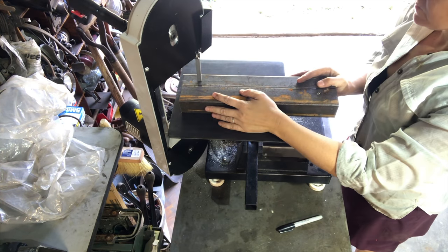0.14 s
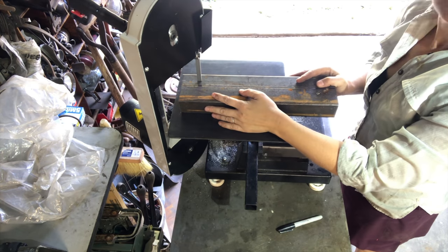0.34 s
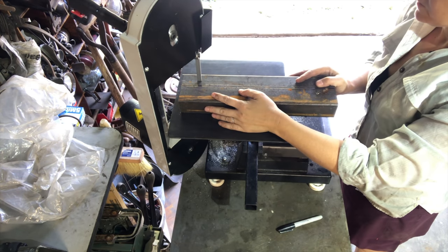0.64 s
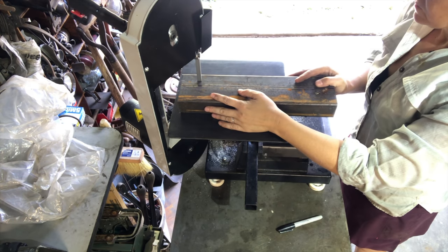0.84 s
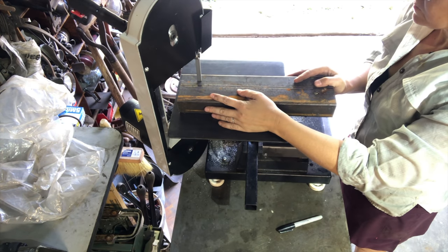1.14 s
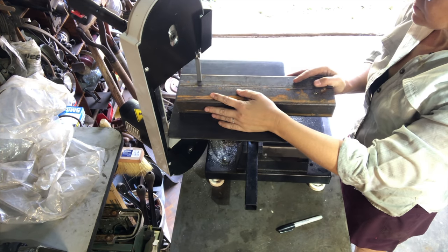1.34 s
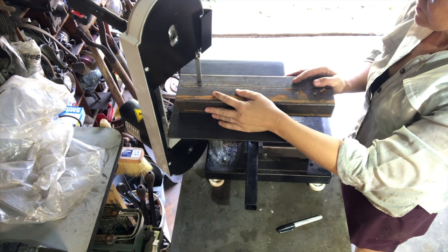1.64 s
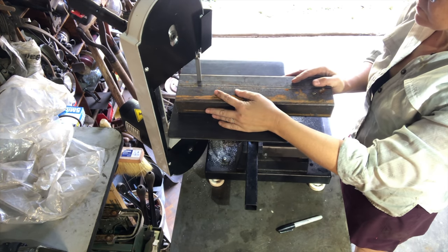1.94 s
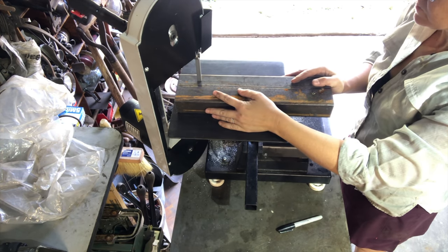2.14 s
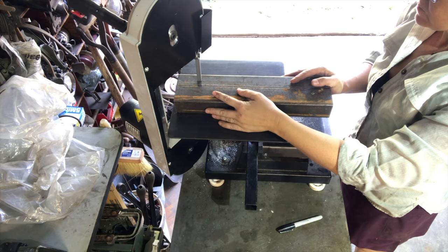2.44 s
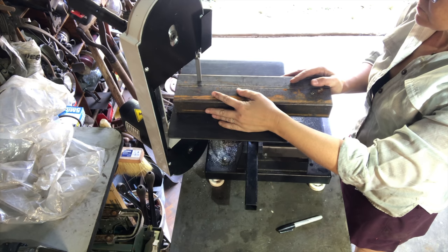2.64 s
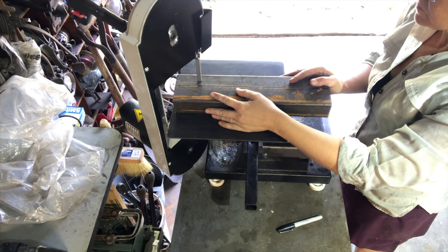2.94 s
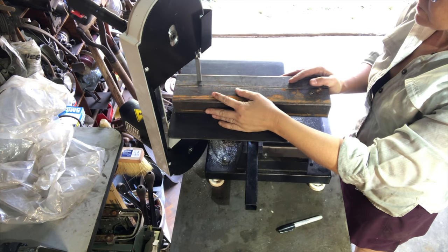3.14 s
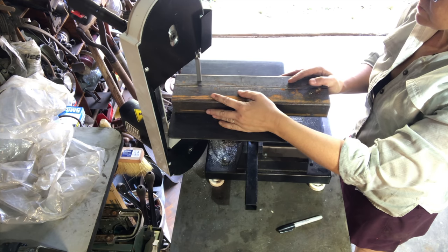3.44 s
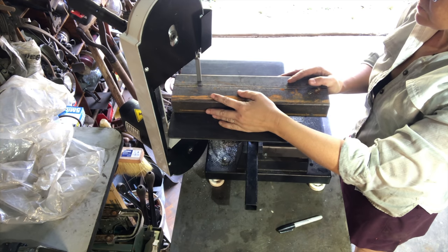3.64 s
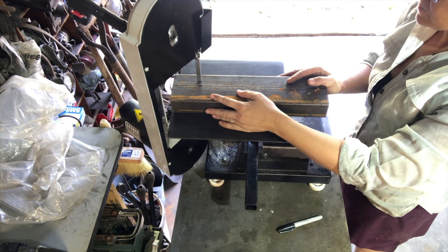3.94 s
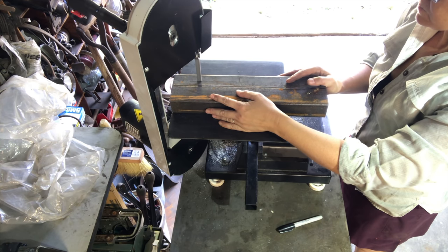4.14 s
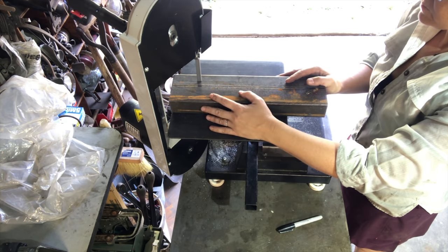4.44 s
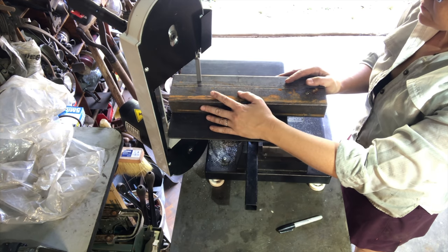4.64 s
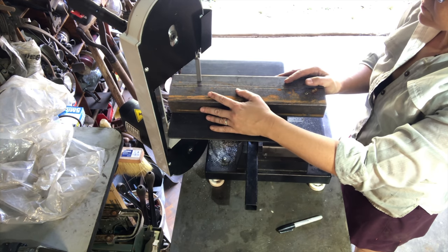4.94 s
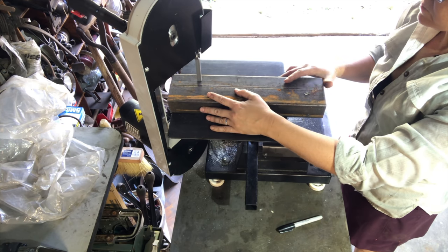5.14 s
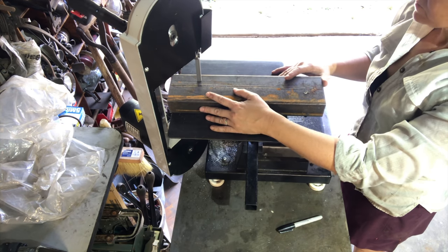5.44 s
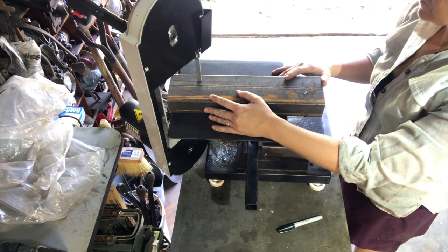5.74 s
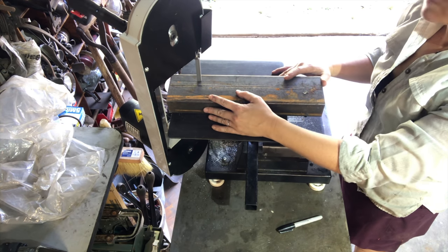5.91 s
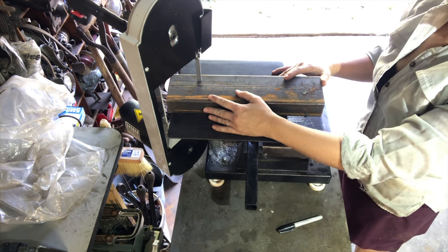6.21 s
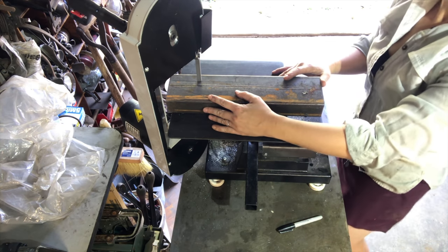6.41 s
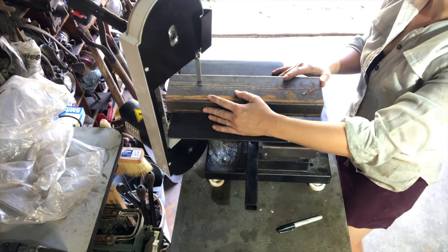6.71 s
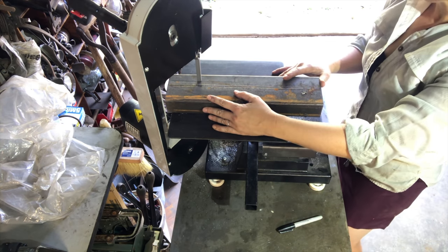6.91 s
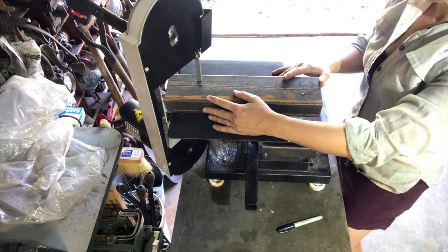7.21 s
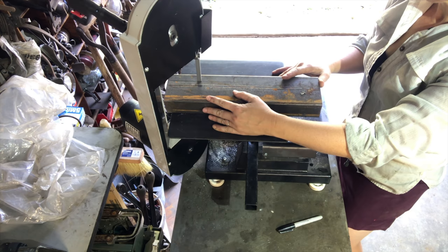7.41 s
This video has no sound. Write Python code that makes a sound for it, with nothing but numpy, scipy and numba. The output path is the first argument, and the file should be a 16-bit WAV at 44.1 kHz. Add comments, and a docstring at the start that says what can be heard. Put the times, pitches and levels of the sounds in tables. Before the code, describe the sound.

A bandsaw cuts a steel tube up close, its motor whining steadily under a pulsing metallic rasp, with high squeals near the end.

```python
"""In a workshop, close by, an upright portable bandsaw cuts a square steel tube fed by hand.
Motor and gears whine at multiples of the shaft speed, and the stand drones. The teeth excite blade and
tube in a rasp that changes colour twice; its pattern repeats with each lap of the blade, whose weld
catches once a lap. The cut wall rings ever lower as the slit grows, swelling whenever it passes a
multiple of the shaft speed, and friction in the deepening slit makes the blade squeal."""
import sys
import numpy as np
from scipy import signal
from scipy.fft import rfft, irfft
from scipy.io import wavfile
from scipy.ndimage import uniform_filter1d
from numba import njit

SR = 44100
rng = np.random.default_rng(int(sys.argv[2]) if len(sys.argv) > 2 else 0)


def wav_out(sig):
    """Save sig, one row per channel (or a flat mono array), as 16-bit PCM at SR to the path in sys.argv[1]."""
    wavfile.write(sys.argv[1], SR, np.round(np.clip(np.atleast_2d(sig).T, -1, 1) * 32767).astype(np.int16))


N = 333837
TIME = np.arange(N) / SR
FREQ = np.fft.rfftfreq(N, 1 / SR)

# shaft speed under load, before the spin-up lag is subtracted: (time [s], speed [Hz])
SHAFT_SPEED = [(.7, 228), (1.1, 225.9), (1.35, 225.6), (2.1, 227.5), (2.45, 226.9), (4.2, 227.1),
               (4.45, 228.1), (5.13, 227.6), (5.27, 229.4), (5.6, 229.5), (6.05, 228.4), (6.6, 230.1),
               (7, 228.7), (7.57, 227.7)]
# three stages of the cut, the early one taking the rest: (time [s], middle share [1], late share [1])
STAGE_SHARES = [(2.62, 0, 0), (2.68, 1, 0), (4.69, 1, 0), (4.73, .25, .4), (5.17, .2, .55), (5.28, 0, .9),
                (6, 0, 1)]
# patches of proud teeth: (position after the weld [laps], extra bite [dB])
PROUD_TEETH = [(0, 8), (.145, 4), (.26, 2.5), (.355, 6), (.465, 5), (.58, 6), (0.702, 8), (.85, 5.5)]
# motor harmonics: (shaft multiple before rounding [1], early level [dB], middle [dB], late [dB])
MOTOR_HARMONICS = [(7.04, -40, -41, -43), (8, -52.5, -74, -56), (9, -41, -45, -42.5), (10, -41.5, -50, -42),
                   (11, -43.5, -48.5, -51), (12, -52.5, -60, -55), (16, -48.5, -50.5, -46),
                   (18, -45, -53, -63), (19, -47.5, -42.5, -42.5), (21, -36.5, -52, -55),
                   (22, -35, -74, -39), (23, -39.5, -36, -51), (24, -36.5, -43.5, -49.5),
                   (26, -46.5, -52, -58), (27, -61, -52, -68), (30, -74, -55.5, -67), (32, -68, -64, -78),
                   (36, -56, -56, -74), (43, -47, -47, -68), (55, -70, -40, -77)]
# tone of the meshing gears: (time [s], level [dB])
GEAR_LEVEL = [(0, -45.5), (.6, -38.5), (2.5, -40.5), (5, -40), (6, -36), (7.57, -36.5)]
# the blade singing on one shaft harmonic: (time [s], level [dB])
BLADE_SONG = [(0, -52), (.2, -46), (.6, -55), (2.6, -54), (4.2, -47), (4.65, -37), (4.75, -50), (6.2, -46),
              (6.75, -39), (7.05, -34.5), (7.57, -33)]
# modes of the stand: (frequency [Hz], width [Hz], gain [dB])
STAND_MODES = [(245.5, 18.5, -3), (298, 28, -3.5), (407.7, 7.7, 1.5), (524, 13, -2), (740, 20, -21)]
# feed of the tube: (time [s], rasp gain [dB], further gain of the chips' sizzle [dB])
FEED_GAIN = [(0, -26, -9), (.9, -25, -7), (2.4, -26, -9.5), (2.8, -25, -8), (4.65, -25.5, -7.5),
             (4.78, -31.5, -5.5), (5.45, -30.5, -5), (5.8, -28, -4), (6.1, -28.5, -2.5), (7.57, -30, -2)]
# the hand eases off or shoves: (time [s], half length [s], change [dB])
HAND_NUDGES = [(.41, 0.011, -3.5), (2.53, .03, -2), (5.236, 0.021, -6.5), (5.272, 0.019, 4),
               (5.402, 0.015, -4), (5.495, 0.017, 1)]
# modes of blade and tube in each stage: (frequency [Hz], width [Hz], gain [dB])
MODES_EARLY = [(2250, 35, -11), (3660, 40, -14), (4020, 69, -7), (4450, 95, -12), (4990, 69, -3),
               (5170, 64, 0), (6500, 250, -24), (8080, 234, -18), (9900, 354, -22), (12920, 142, -22),
               (14160, 250, -24)]
MODES_MIDDLE = [(1631, 29, -5.5), (2280, 13.6, -7.5), (3420, 51, -14.5), (3970, 69, -8), (4540, 174, -13.5),
                (5126, 166, -5.5), (7980, 36, -24), (9460, 1140, -22), (11360, 240, -15.5),
                (12400, 190, -17), (12700, 78, -24)]
MODES_LATE = [(1646, 68, -2), (2292, 43, 0.5), (3506, 104, -5.5), (3914, 280, -6), (4576, 160, -5),
              (5300, 203, -6), (6960, 54, -8.5), (8056, 205, -2), (9350, 740, -7), (10540, 155, 0),
              (11620, 150, -10.5)]
# broad scraping spectrum in each stage: (frequency [Hz], gain [dB])
SCRAPE_EARLY = [(40, -50), (110, -59.5), (240, -35.5), (1000, -34), (1350, -21.5), (1800, -13),
                (2400, -15.5), (2850, -23.5), (3300, -16.5), (5400, -16.5), (6200, -20.5), (11000, -24),
                (14500, -20.5), (15800, -33)]
SCRAPE_MIDDLE = [(40, -66), (110, -60), (240, -38), (1000, -32.5), (1350, -26), (1800, -25.5), (2400, -24),
                 (2850, -29), (3300, -20.5), (5400, -27.5), (6200, -32.5), (11000, -24), (14500, -23),
                 (15800, -30)]
SCRAPE_LATE = [(40, -65), (110, -53), (240, -27), (1000, -26), (1350, -14.5), (1800, -8), (2400, -7.5),
               (2850, -16), (3300, -7), (5400, -17.5), (6200, -15.5), (11000, -18.5), (14500, -18),
               (15800, -22)]
# drive of the teeth on the cut wall: (time [s], level before the swell [dB])
WALL_DRIVE = [(0, -51), (.6, -37), (1.25, -37), (1.6, -38.5), (2.2, -33.5), (2.7, -42), (3, -38),
              (3.8, -37.5), (4.3, -33), (4.9, -26.5), (5.35, -37.5), (6.1, -38.5), (7.1, -32.5),
              (7.57, -44)]
# faint upper mode at the slit: (time [s], frequency [Hz], level [dB])
WALL_UPPER_MODE = [(0, 8200, -54), (.8, 7660, -42), (1.7, 7380, -48), (2.6, 7320, -46), (3.5, 6900, -51),
                   (4.6, 6900, -76), (7.57, 6670, -48)]
# squeaks as the teeth first catch: (time [s], half length [s], frequency [Hz], peak level [dB])
SQUEAKS = [(.145, .04, 5050, -27), (.181, .016, 2208, -28), (.181, .018, 4416, -27)]
# how hard the weld catches: (time [s], strength [dB])
WELD_STRENGTH = [(.18, -18), (.38, -25), (.9, -33), (1.35, -18.5), (2.5, -17), (4.2, -16.5), (4.6, -25),
                 (5.1, -18.5), (5.6, -28.5), (6.5, -20), (7.1, -28)]
# two high blade modes: (time [s], lower mode [Hz], its level [dB], upper mode [Hz], its level [dB])
SQUEAL_MODES = [(0, 7960, -65, 10700, -75), (3.6, 8460, -64, 10500, -59), (4.9, 8240, -38, 10570, -49),
                (5.7, 8300, -51, 10370, -49), (6.3, 8500, -51.5, 10800, -52), (6.65, 8160, -56, 10610, -36),
                (7.1, 8030, -35.5, 10600, -36), (7.57, 7960, -32, 10700, -48)]


def undb(db):
    """Amplitude ratio of a level in decibels."""
    return 10 ** (np.asarray(db) / 20)


def curves(table):
    """Linear interpolation of each column in time."""
    times, *columns = np.transpose(table)
    return [np.interp(TIME, times, column) for column in columns]


def unit(x):
    """Normalisation to rms 1."""
    return x / np.sqrt(np.mean(x ** 2))


def steady(x, span_s):
    """Normalisation to a running rms of 1."""
    return x / np.sqrt(np.abs(uniform_filter1d(x ** 2, int(span_s * SR) + 1)) + 1e-14)


def bump(x, half_width):
    """Gaussian pulse of height 1 at x = 0."""
    return np.exp(-(x / half_width) ** 2)


def wander(rate_hz):
    """Smooth random modulation of rms 1."""
    knots = rng.standard_normal(4096)
    path = np.interp(TIME * rate_hz, np.arange(len(knots)), knots)
    return unit(uniform_filter1d(path, int(SR / rate_hz / 2) + 1))


def resonances(modes):
    """Superposition of steep resonance peaks, as a power response."""
    return sum(undb(db) ** 2 / (1 + (np.sqrt(2) - 1) * (2 * (FREQ - hz) / width) ** 2) ** 2
               for hz, width, db in modes)


def broadband(points):
    """Power response interpolated over logarithmic frequency."""
    hz, db = np.transpose(points)
    return undb(np.interp(np.log(FREQ + 1), np.log(hz), db)) ** 2


def colour(x, power, size=8192):
    """Minimum-phase filtering: by causality, resonances ring after each blow."""
    log_gain = np.interp(np.fft.rfftfreq(size, 1 / SR), FREQ, np.log(power + 1e-14) / 2)
    cepstrum = irfft(log_gain)[:size // 2]
    response = irfft(np.exp(rfft(np.r_[cepstrum[0], 2 * cepstrum[1:]], size)))
    return signal.fftconvolve(x, response)[:N]


def band(x, kind, edge_hz):
    """Steep filtering with a maximally flat passband."""
    return signal.sosfilt(signal.butter(6, edge_hz, kind, fs=SR, output="sos"), x)


@njit
def resonator(x, hz, width_hz):
    """Damped resonance with a moving centre, as a state-variable band-pass."""
    out, band_state, low_state = np.empty(len(x)), 0., 0.
    for i in range(len(x)):
        tuning, damping = np.tan(np.pi * hz[i] / SR), width_hz / hz[i]
        velocity = (band_state + tuning * (x[i] - low_state)) / (1 + tuning * (tuning + damping))
        band_state = 2 * velocity - band_state
        low_state += 2 * tuning * velocity
        out[i] = damping * velocity
    return out


def shaft_speed(lag_hz=15.5, spin_up_s=.25):
    """Exponential approach to a running speed [Hz] that sags and recovers with the load."""
    return curves(SHAFT_SPEED)[0] - lag_hz * np.exp(-TIME / spin_up_s)


def bite(laps, plain_db=-1.5, flutter_db=1.56):
    """Periodic modulation [dB]: each lap the proud teeth dig in and those behind the weld skip."""
    def patch(position, half_length):
        return bump((laps - position + .5) % 1 - .5, half_length)
    proud_db = sum(db * patch(position, .055) for position, db in PROUD_TEETH)
    skip_db = -3 * patch(.1, .025)
    return plain_db + proud_db + skip_db + flutter_db * wander(200)


def partial(turns, order, shake=.013, flicker=.9):
    """Phase modulation: gear play shakes a shaft multiple, the higher the more; its level flickers."""
    phase = 2 * np.pi * (order * turns + rng.random()) + shake * order * wander(70)
    flicker_db = flicker * np.sqrt(order / 10) * (wander(14) + wander(90))
    return np.sqrt(2) * np.sin(phase) * undb(flicker_db)


def whine(turns, laps, shares, mesh_ratio=6.033, song_order=20, first_blade_order=21):
    """Periodic forcing: the shaft drives motor harmonics, a gear-mesh tone and the blade's song."""
    spin_up_db = -.5 * np.clip(1 - TIME / .77, 0, 1)  # per order, so high harmonics fade in most
    sputter_db = -2 + .58 * bite(laps)
    motor = 0
    for multiple, *stage_db in MOTOR_HARMONICS:
        order = round(multiple)
        db = np.array(stage_db) @ shares + order * spin_up_db
        if order >= first_blade_order:  # these sound through the blade and follow its bite
            db += sputter_db
        motor += partial(turns, order) * undb(db)
    gears = partial(turns, mesh_ratio, flicker=0) * undb(curves(GEAR_LEVEL)[0])
    song = partial(turns, song_order, shake=.0078, flicker=.7) * undb(curves(BLADE_SONG)[0])
    return motor + gears + song


def stand_drone(drone_db=-65, hum_hz=123.8, hum_db=-85.5):
    """Random excitation: the saw shakes the stand's low modes, while the motor frame hums."""
    drone = unit(colour(rng.standard_normal(N), resonances(STAND_MODES)))
    hum = np.sqrt(2) * np.sin(2 * np.pi * hum_hz * TIME)
    return drone * undb(drone_db) + hum * undb(hum_db)


def tooth_force(turns, grain_db=2.5, pulse_depth=.16):
    """Broadband excitation by dense tiny fractures, pulsing slightly with the shaft."""
    grains = np.repeat(rng.standard_normal(N // 16 + 1), 16)[:N]
    pulsing = 1 + pulse_depth * np.cos(2 * np.pi * turns)
    return unit(rng.standard_normal(N) * undb(grain_db * grains) * pulsing)


def hand_pressure():
    """Amplitude modulation [dB] by brief changes in the hand's pressure."""
    return sum(db * bump(TIME - at_s, half_s) for at_s, half_s, db in HAND_NUDGES)


def rasp(force, laps, shares, split_hz=6300, body_db=-4, sizzle_db=-1):
    """Source and filter: fractures excite the modes of blade and tube, and chips sizzle above."""
    feed_db, chips_db = curves(FEED_GAIN)
    bite_db = bite(laps)
    stages = (MODES_EARLY, SCRAPE_EARLY), (MODES_MIDDLE, SCRAPE_MIDDLE), (MODES_LATE, SCRAPE_LATE)
    out = 0
    for share, (modes, spectrum) in zip(shares, stages):
        ring = colour(force, resonances(modes))
        scrape = colour(force[::-1], broadband(spectrum))  # reversal decorrelates it from the ring
        body = band(ring * undb(.71 * bite_db) + scrape * undb(.37 * bite_db), "lowpass", split_hz)
        body /= np.std(band(body, "bandpass", [3200, 5800]))
        sizzle = unit(band(ring + scrape, "highpass", split_hz) * undb(.68 * bite_db))
        out += np.sqrt(share) * (body * undb(body_db) - sizzle * undb(sizzle_db + chips_db))
    return out * undb(feed_db + hand_pressure())


def wall_ring(force, turns, shaft_hz, start_hz=2229, limit_hz=1217, sink_s=5.67,
              reach_hz=31.8, swell_db=10):
    """Entrainment: the freed wall's falling mode beats with a nearby shaft harmonic, then locks on."""
    hz = limit_hz + (start_hz - limit_hz) * np.exp(-TIME / sink_s)
    order = np.round(hz / shaft_hz)
    detune_hz = hz - order * shaft_hz
    lock = np.cos(np.pi * detune_hz / shaft_hz) ** 2 / (1 + (detune_hz / reach_hz) ** 2)
    drive_db = curves(WALL_DRIVE)[0] + swell_db * lock + hand_pressure()
    rattling = steady(resonator(resonator(force, hz, 24.), hz, 110.), span_s=.05)
    singing = np.sqrt(2) * np.sin(2 * np.pi * np.cumsum(hz + 5 * wander(45)) / SR)
    purity = np.clip((drive_db + 39) / 10, 0, .9)  # harder drive gives a purer tone
    free = np.sqrt(purity) * singing + np.sqrt(1 - purity) * rattling
    forced = partial(turns, order, shake=.03)
    forced_share = .92 * lock ** .8
    ring = np.sqrt(forced_share) * forced + np.sqrt(1 - forced_share) * free
    flutter_db = 1.33 * wander(90)
    upper_hz, upper_db = curves(WALL_UPPER_MODE)
    upper = unit(resonator(force, upper_hz, 27.)) * undb(upper_db)
    return ring * undb(drive_db + flutter_db - 1) + upper


def first_squeaks():
    """Stick-slip friction: blade and tube wall squeak as the teeth first catch."""
    return sum(bump(TIME - at_s, half_s) * np.sin(2 * np.pi * hz * TIME) * undb(db)
               for at_s, half_s, hz, db in SQUEAKS)


def weld_ping(laps, ping_hz=5180, rise_s=.0042, fall_s=.005, scatter_db=.6, gain_db=-2):
    """Impulsive excitation: once a lap the thicker weld pings the blade, mostly in one mode."""
    nearest_lap = np.round(laps).astype(int)
    lag_s = (laps - nearest_lap) / (np.gradient(laps) * SR)
    scatter = rng.standard_normal(np.ptp(nearest_lap) + 1)[nearest_lap]
    peak = undb(curves(WELD_STRENGTH)[0] + scatter_db * scatter + gain_db)
    envelope = peak / (1 + (lag_s / np.where(lag_s < 0, rise_s, fall_s)) ** 2) ** np.sqrt(2)
    ping = np.sqrt(2) * np.sin(2 * np.pi * np.cumsum(ping_hz + 55 * wander(220)) / SR)
    modes = [(4000, 150, 0), (4480, 180, -3), (5150, 400, 0), (2230, 100, -9), (8100, 400, -13)]
    scrape = steady(colour(rng.standard_normal(N), resonances(modes)), span_s=.004)
    return (ping + undb(-5) * scrape) * envelope


def blade_squeal(force):
    """Frictional excitation: rubbing in the deepening slit drives two high modes of the blade."""
    low_hz, low_db, high_hz, high_db = curves(SQUEAL_MODES)
    return sum(unit(resonator(resonator(force, hz, 130.), hz, 260.)) * undb(db)
               for hz, db in ((low_hz, low_db), (high_hz, high_db)))


def scene(turns_per_lap=43.578, first_weld_s=.1812):
    """Superposition of the saw's sources, with the blade geared to the motor shaft."""
    shaft_hz = shaft_speed()
    turns = np.cumsum(shaft_hz) / SR
    laps = (turns - np.interp(first_weld_s, TIME, turns)) / turns_per_lap  # weld at whole numbers
    middle, late = curves(STAGE_SHARES)
    shares = np.clip([1 - middle - late, middle, late], 0, 1)
    cutting = rasp(tooth_force(turns), laps, shares) + first_squeaks() + weld_ping(laps)
    ringing = wall_ring(tooth_force(turns), turns, shaft_hz) + blade_squeal(tooth_force(turns))
    return (whine(turns, laps, shares) + stand_drone() + cutting + ringing)[None]


def record(dry, top_hz=15750):
    """Band limiting: a steep low-pass removes the highest treble."""
    return signal.sosfilt(signal.ellip(10, .2, 80, top_hz, fs=SR, output="sos"), dry)


dry = scene()
out = record(dry)
wav_out(out)
```